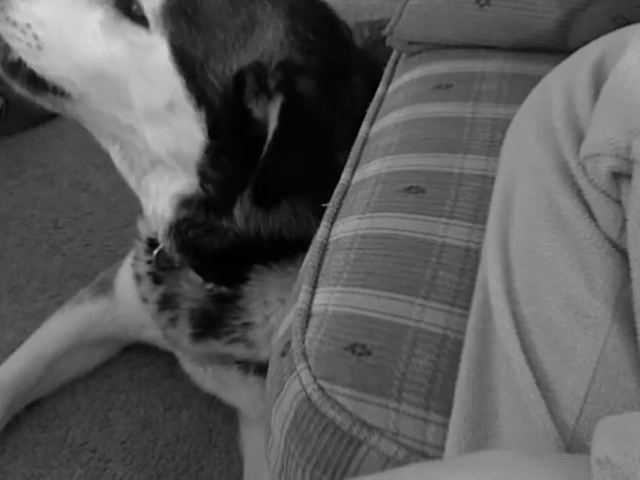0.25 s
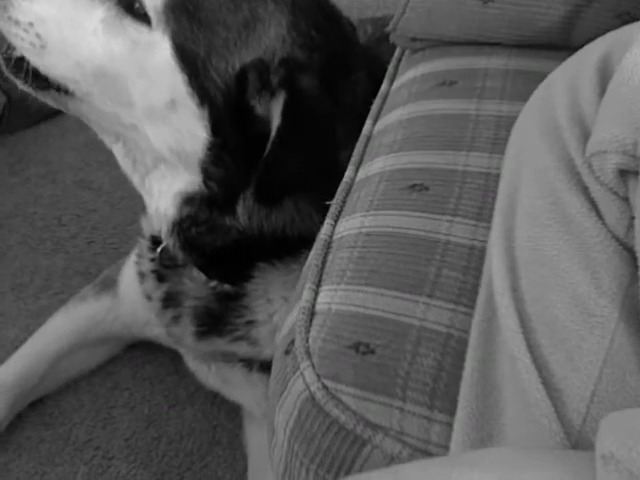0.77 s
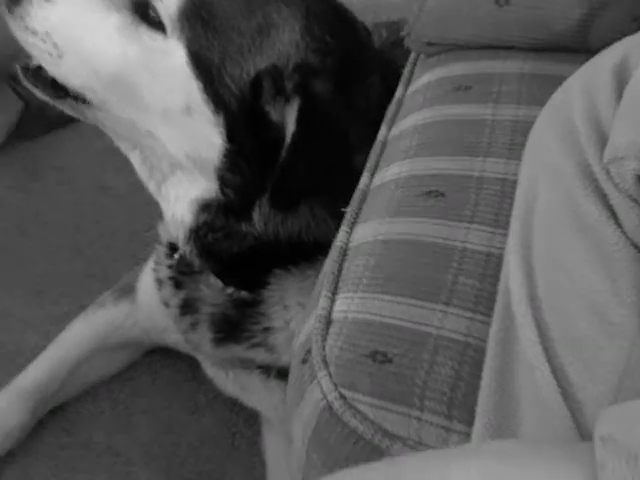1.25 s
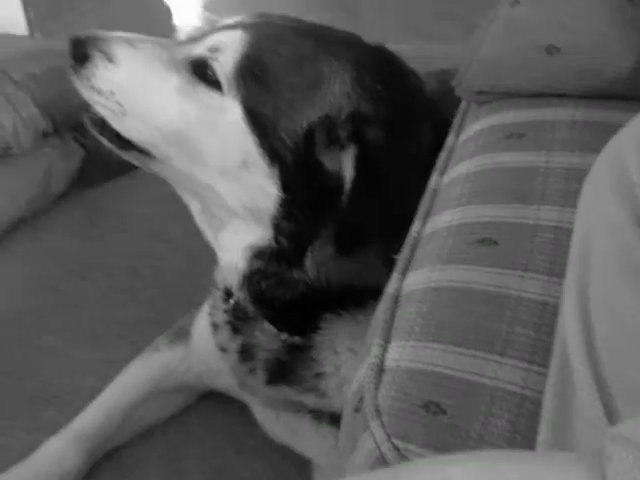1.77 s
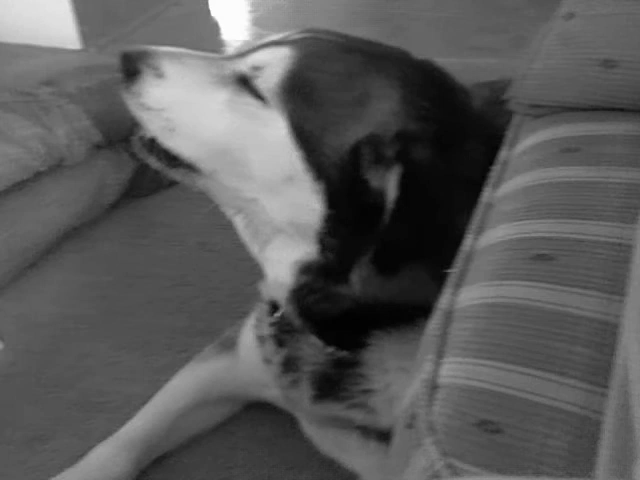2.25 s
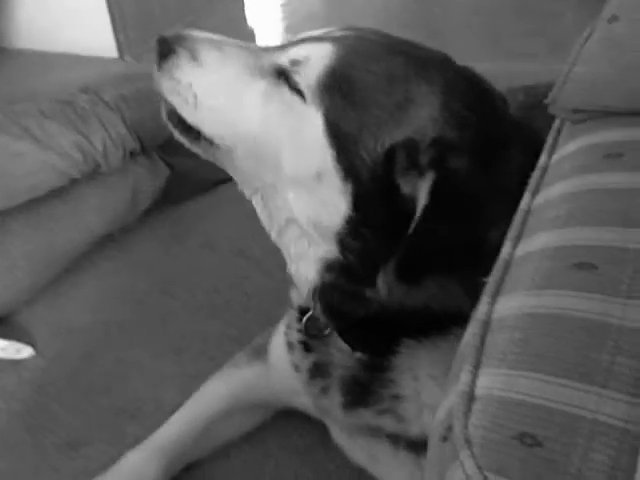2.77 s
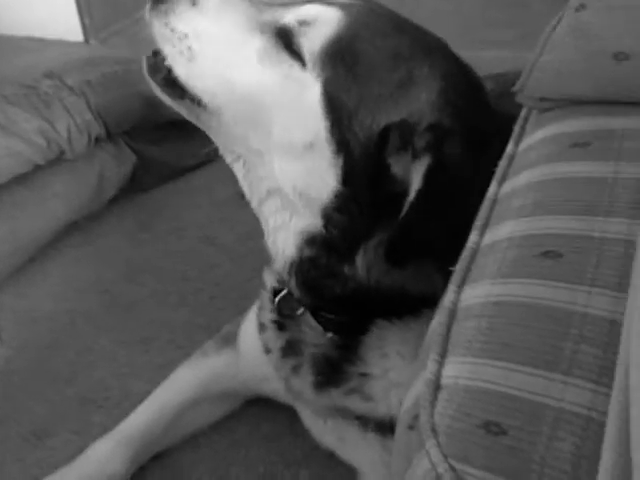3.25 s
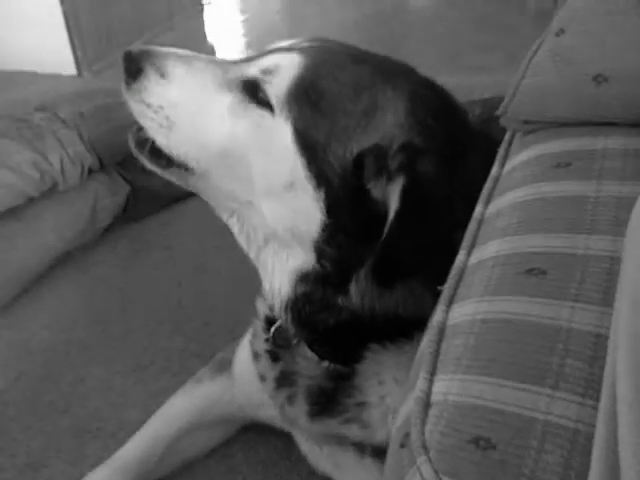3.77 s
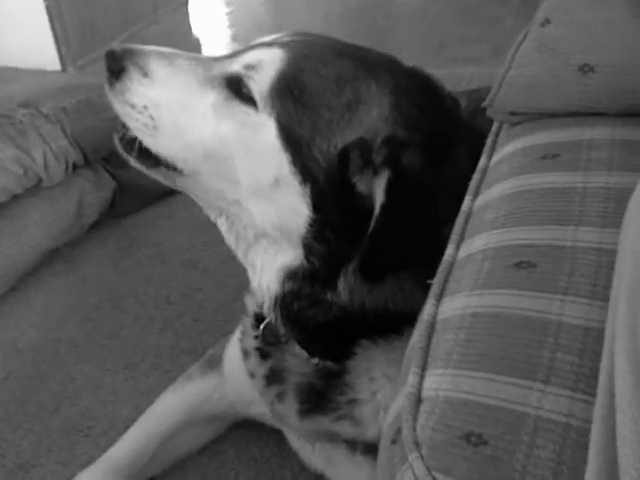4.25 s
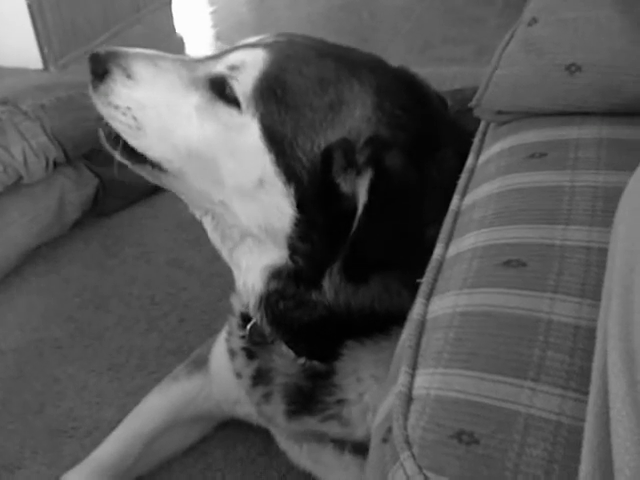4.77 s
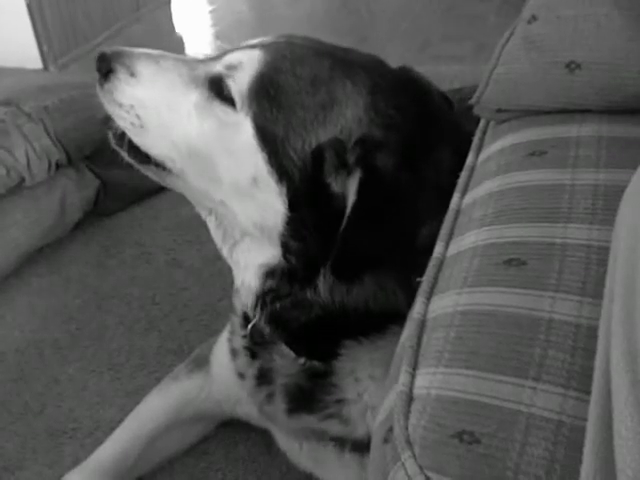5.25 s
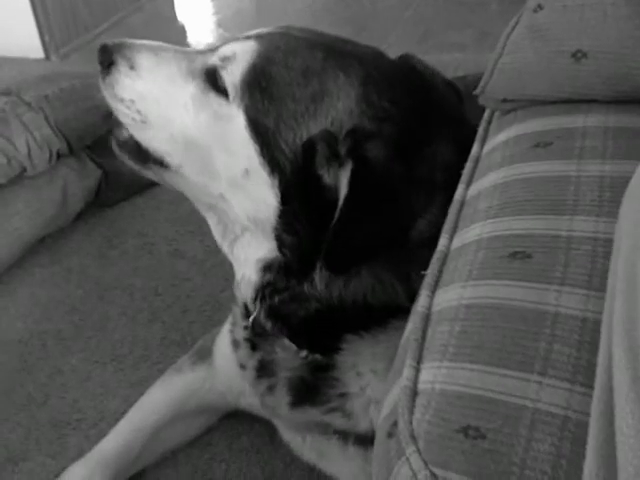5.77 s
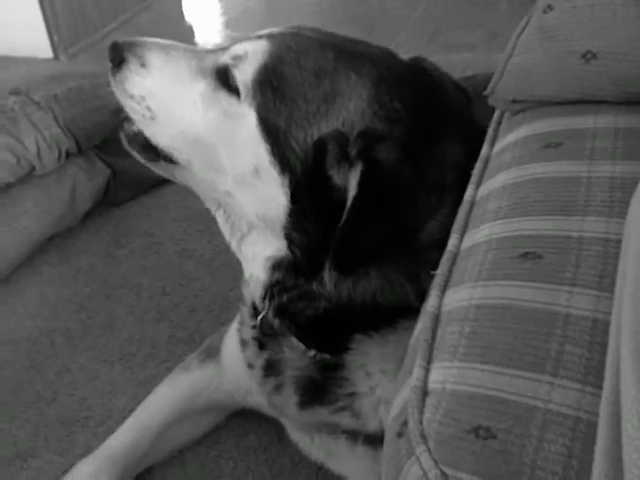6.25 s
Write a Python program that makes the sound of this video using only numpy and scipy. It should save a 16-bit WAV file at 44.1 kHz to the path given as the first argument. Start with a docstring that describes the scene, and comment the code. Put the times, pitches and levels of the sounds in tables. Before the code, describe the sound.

Close to the microphone in a quiet, softly furnished room, an old hound is already mid-howl at 0 s, two pitches sounding together, bright at first and darkening. The second pitch stops around 0.8 s; the remaining note sags gently and ends in a weak gargle near 1.5 s. Tiny lip clicks follow at 1.6-1.7 s. A thin, very high whistling whine chirps in at 1.8 s with airy nasal hiss, and from 2 s the howl swells up, loudest around 2.2-2.7 s, then roughens into a gargle until 3.2 s. It slides down, wavers and cracks between clear and rough notes, dying by 5.2 s; the whistle sinks and stops at 4 s. Faint dull bumps appear from 3.9 to 4.8 s and at 6.2 s. The whistle returns at 5.3 s, a gargling howl joins at 5.6 s, clearing and cracking until the end at 6.5 s.

```python
"""Old hound howling indoors

A carpeted room: an old hound beside a sofa, an arm's length from the microphone.
Its vocal folds sing clean notes as gliding harmonics, the first beside a second pitch, or slip in a rough gargle.
Twice a thin whistling whine, a gliding sine with flutter, rides on top with a hiss of air, shaped noise.
Clicks of the lips and soft bumps are short noise bursts, over a quiet room tone and faint steady tones."""
import sys
import numpy as np
from scipy import signal
from scipy.fft import rfft, irfft
from scipy.io import wavfile
from scipy.ndimage import uniform_filter1d

SR = 44100
rng = np.random.default_rng(int(sys.argv[2]) if len(sys.argv) > 2 else 0)


def put_to_file(sound):
    """Save the sound as 16-bit audio at rate SR, in the file named by the first command-line argument."""
    columns = np.atleast_2d(sound).T  # one column per channel
    safe = np.clip(columns, -1, 1)
    whole_steps = np.round(safe * 32767)
    wavfile.write(sys.argv[1], SR, whole_steps.astype(np.int16))


N = 286650
T = np.arange(N) / SR


def undb(db):
    """Decibels to gain."""
    return 10 ** (np.asarray(db) / 20)


def unit(x):
    """Scale to rms 1."""
    return x / np.sqrt(np.mean(x ** 2))


def curves(rows):
    """The columns of a table, joined by straight lines in time."""
    s, *columns = np.transpose(rows)
    return [np.interp(T, s, c) for c in columns]


def gate(start, end, fade):
    """1 between two times, with sloping edges just outside them."""
    edges = np.minimum(T - start, end - T) / fade
    return np.clip(edges + 1, 0, 1) ** 2


def swell(start, end, attack, release):
    """Attack, hold and release between two times."""
    edges = np.minimum((T - start) / attack, (end - T) / release)
    return np.sin(np.pi / 2 * np.clip(edges, 0, 1)) ** 2


def gain_at(hz, colour):
    """Gain of a colour at these frequencies, read on a logarithmic pitch scale."""
    f, db = np.transpose(colour)
    return undb(np.interp(np.log(np.maximum(hz, 1)), np.log(f), db))


def noise(colour):
    """Noise of a given colour, rms 1."""
    spectrum = rfft(rng.standard_normal(N))
    return unit(irfft(spectrum * gain_at(np.arange(N // 2 + 1) * SR / N, colour), N))


def wander(hz):
    """Random drift up to about a given rate, rms 1."""
    f = np.arange(N // 20) * SR / N
    real, imaginary = rng.standard_normal((2, len(f)))
    return unit(irfft((real + 1j * imaginary) / (1 + (f / hz) ** 4), N))


def turn(hz):
    """Phase of an oscillator, in radians."""
    return 2 * np.pi * np.cumsum(hz) / SR


def harmonics(phase, hz, levels_db, colour, on, count=30):
    """The low harmonics, each at its own level, and a tail of overtones in the given colour."""
    out, live = np.zeros(N), on > 0
    *low, high = (undb(db[live]) for db in levels_db)
    k = np.arange(len(low) + 1, count)[:, None]
    # standing waves lift some overtones and swallow others as the pitch glides
    grid = np.linspace(0, SR / 2, 300)
    ripple = undb(4.5 * np.interp(k * hz[live], grid, rng.standard_normal(len(grid))))
    tail = (gain_at(k * hz[live], colour) * ripple * np.sin(k * phase[live])).sum(axis=0)
    low_sum = sum(g * np.sin((i + 1) * phase[live]) for i, g in enumerate(low))
    out[live] = high * tail + low_sum
    return np.sqrt(2) * out * on


# colour of the air that leaks through the folds: (frequency [Hz], level [dB])
HUSK_COLOUR = [(200, -28), (330, -11), (500, 4.5), (1000, -5.5), (1400, 9), (1600, -7.5), (2000, 5),
               (2900, -6), (3400, -9), (4100, -17.5), (5200, -16.5), (7000, -22), (11000, -29),
               (15000, -33.5)]


def note(hz, levels_db, on, colour, jitter, overtones_db, husk_db):
    """A clean note: the folds swing evenly and leak air that pulses once a cycle."""
    phase = turn(hz * (1 + jitter * wander(53) + 0.0013 * wander(350)))
    # the faint overtones follow the highest of the strong harmonics
    bright_db = np.mean(levels_db[-3:], axis=0) + overtones_db
    tone = harmonics(phase, hz, levels_db + [bright_db], colour, on)
    tone = tone * (1 + 0.023 * wander(46))
    leak_db = np.mean(levels_db, axis=0) + husk_db + 2.0 * wander(28)
    husk = noise(HUSK_COLOUR) * (1 + .5 * np.cos(phase)) * on * undb(leak_db)
    return tone + husk


def taps(events, colour, rise, decay, trim_db):
    """Short noise bursts that swell and die away, rise and decay in seconds."""
    envelope = np.zeros(N)
    for s, db in events:
        age = np.maximum(T - s, 0)
        envelope += undb(db + trim_db) * (1 - np.exp(-age / rise)) * np.exp(-age / decay)
    return envelope * noise(colour)


# colour of the quiet room: (frequency [Hz], level [dB])
ROOM_COLOUR = [(12, -15.5), (35, -9), (70, -8.5), (95, -5), (125, 1.5), (165, -7.5), (220, -7), (500, -11),
               (1000, -19), (2000, -12), (4000, -21), (8000, -30), (15000, -27.5)]


def room_tone():
    """The quiet room: coloured noise whose level drifts slowly."""
    return noise(ROOM_COLOUR) * undb(-56 + wander(4))


# faint electronic tones: (frequency [Hz], level [dB])
FAINT_TONES = [(8000, -75.5), (12220, -73.5), (12279, -83)]


def electronic_tones():
    """Steady sines high in the treble."""
    return sum(np.sqrt(2) * undb(db) * np.sin(2 * np.pi * hz * T) for hz, db in FAINT_TONES)


# higher pitch sung along with the first note: (start [s], end [s], pitch [Hz])
SECOND_PITCH = (0.0, 0.809, 447)
# its harmonics 1 to 9 before accent, fade and closing: (level [dB])
SECOND_LEVELS = [-31.5, -41.5, -51, -54.5, -52, -48.5, -48, -50.5, -42.5]
# colour of its overtones: (frequency [Hz], level [dB])
SECOND_OVERTONES = [(4400, -30.5), (5000, -21.5), (5600, -27.5), (6300, -20), (9000, -28), (15000, -36)]
ACCENT_DB, ACCENT_S = 4.5, 0.19  # extra level at the start, and its decay time
# one resonance sinks through the harmonics as the mouth closes
OPEN_HZ, CLOSED_HZ, CLOSING_S, CLOSING_WIDTH_HZ, CLOSING_DB = 2393, 1220, 0.29, 410, 21
DARKEN_DB_PER_S = 7  # fade of the ninth harmonic, less for those below
DROOP, DROOP_S = .04, 0.013  # sag of the pitch as it dies, as a share, and its time scale


def second_voice():
    """A steady higher pitch beside the first note, darkening as the mouth closes."""
    start, end, pitch_hz = SECOND_PITCH
    age = np.maximum(T - start, 0)
    droop = DROOP / (1 + np.exp(np.minimum((end + DROOP_S - T) / DROOP_S, 50)))
    hz = pitch_hz * (1 + 0.0054 * wander(10) - droop)
    centre_hz = CLOSED_HZ + (OPEN_HZ - CLOSED_HZ) * np.exp(-age / CLOSING_S)
    accent_db = ACCENT_DB * np.exp(-age / ACCENT_S)
    fade_db = DARKEN_DB_PER_S * age / len(SECOND_LEVELS)
    levels_db = []
    for k, db in enumerate(SECOND_LEVELS, 1):
        resonance_db = CLOSING_DB * np.exp(-((k * hz - centre_hz) / CLOSING_WIDTH_HZ) ** 2)
        levels_db.append(db + accent_db - k * fade_db + 1.8 * wander(7.6) + resonance_db)
    return note(hz, levels_db, gate(start, end, 0.049), SECOND_OVERTONES,
                jitter=0.0031, overtones_db=-2.0, husk_db=-9.5)


# clean notes, one short curve each: (time [s], pitch [Hz], level of the fundamental [dB],
# brightness: upper mouth resonance against the fundamental [dB],
# edge: overtones above that resonance against the fundamental [dB])
NOTE_CURVES = [
    [(0.012, 394.7, -21.5, -10, -5), (0.018, 394.8, -22, -21, 5), (0.072, 393.2, -26, -9, -14),
     (0.174, 382.6, -19.5, -18.5, -17), (0.364, 371.1, -22, -11, -23), (0.508, 371.0, -22, -9.5, -15.5),
     (0.762, 364.8, -24, -11.5, -32.5), (0.85, 359.7, -26.5, -5.5, -24.5), (1.138, 360.6, -27, -3, -25),
     (1.375, 353.2, -29.5, -17.5, -24)],
    [(2.16, 465, -13, -8, -30.5), (2.18, 454, -13.5, -11, -34), (2.332, 445, -12.5, -5, -33),
     (2.424, 469, -9, -8.5, -13.5), (2.502, 480, -12.5, -10, -5), (2.546, 499.7, -10, -7, -9.5),
     (2.604, 511, -8, -17, -23), (2.712, 452, -8.5, -5, -28), (2.755, 443, -24, -9, -26)],
    [(3.22, 441, -17, -23, -33), (3.25, 436, -11, -27, -44), (3.308, 430, -9, -22.5, -39.5),
     (3.464, 402.5, -32.5, -13, -17), (3.574, 378, -21.5, -7, -31), (3.586, 391, -21.5, -5, -17),
     (3.65, 379, -20, -11.5, -40), (3.79, 362, -21, -17, -21), (3.992, 379, -23.5, -14.5, -20),
     (4.04, 392, -24, -17.5, -15.5)],
    [(4.115, 421.7, -17, -6.5, -34), (4.183, 414.7, -17, -7, -28), (4.235, 408.7, -23.5, -11, -16),
     (4.333, 402.6, -19.5, -16.5, -32), (4.39, 417.1, -23.5, -8, -20.5)],
    [(4.675, 410.2, -23.5, -18, -25.5), (4.721, 401.9, -22.5, -21.5, -25),
     (4.825, 389.0, -27, -14.5, -18.5), (4.915, 388.2, -25.5, -19, -25)],
    [(6.015, 409.7, -20, -10, -26.5), (6.047, 411.7, -27.5, -9, -24), (6.083, 387.3, -25, -5, -21),
     (6.217, 393.9, -29, -2.5, -16), (6.31, 406.1, -23, -15.5, -15)],
    [(6.395, 448.1, -19.5, -9, -31), (6.421, 441.8, -16, -10, -29), (6.459, 393.7, -24.5, -12, -25),
     (6.49, 407.0, -20, -11, -24.5)],
]
# how mouth and room colour harmonics 2 to 6: (frequency [Hz], level against the fundamental [dB])
VOWEL_COLOUR = [(700, -5), (745, -5.5), (835, -10), (885, -21.5), (930, -19), (1070, -19), (1170, -7.5),
                (1340, -7), (1450, -15.5), (1580, -26), (1680, -20), (1790, -26), (1940, -22.5),
                (2120, -28), (2350, -27.5), (2520, -39.5), (2700, -29), (3050, -56)]
# how far a harmonic follows the two controls: (frequency [Hz], share of brightness, share of edge)
MOUTH_OPENING = [(734, 0.53, 0.063), (945, 0, 0.25), (1100, 0.83, 0), (1430, 1, 0), (1800, 0, 0.66),
                 (2600, 0, 0.58)]
# colour of the overtones: (frequency [Hz], level [dB])
THROAT_COLOUR = [(2400, -5), (2850, -2), (3300, -22.5), (4300, -26.5), (5000, -11), (5600, -21.5),
                 (6200, -16.5), (7500, -21.5), (11000, -31.5), (15000, -33)]
USUAL_BRIGHTNESS_DB, USUAL_EDGE_DB = -9.5, -20
# the folds grow less steady when pushed: dB of jitter per dB of level above an easy level
EASY_DB, STRAIN = -20, .4


def howl():
    """The main voice: its harmonics glide through the vowel and brighten as the mouth opens."""
    hz, db, brightness_db, edge_db = curves([row for rows in NOTE_CURVES for row in rows])
    on = np.max([gate(rows[0][0], rows[-1][0], .024) for rows in NOTE_CURVES], axis=0)
    at_hz, by_brightness, by_edge = np.transpose(MOUTH_OPENING)
    levels_db = [db]
    for k in range(2, 7):
        bright_lift_db = np.interp(k * hz, at_hz, by_brightness) * (brightness_db - USUAL_BRIGHTNESS_DB)
        edge_lift_db = np.interp(k * hz, at_hz, by_edge) * (edge_db - USUAL_EDGE_DB)
        vowel_db = 20 * np.log10(gain_at(k * hz, VOWEL_COLOUR))
        levels_db.append(db + vowel_db + bright_lift_db + edge_lift_db + 1.45 * wander(14))
    jitter = 0.0024 * undb(STRAIN * (db - EASY_DB))
    return note(hz, levels_db, on, THROAT_COLOUR, jitter, overtones_db=-4.5, husk_db=-16.0)


# gargles: (start [s], end [s], attack [s], release [s],
# slower fold at start [Hz], at end [Hz], faster fold at start [Hz], at end [Hz],
# rise of both in mid-gargle [share], pull of the slower fold [0-1], disorder [0-1],
# level in each of three mouth resonances [dB] x 3, reference level of the rattle [dB])
GARGLE_EVENTS = [ (1.365, 1.551, .025, 0.19, 358, 375, 423, 433, 0.0028, 0.63, 0.54, -28.5, -50, -44, -48),
                 (1.967, 2.099, .12, 0.014, 222, 276.8, 432, 559.7, 0, 0.14, 0.076, -15, -43, -37.5, -49),
                 (2.088, 2.182, 0.025, 0.0095, 440, 432, 582.4, 504, 0.0075, 0.66, 0.57, -24, -32.5, -31, -48),
                 (2.768, 3.06, 0.0053, 0.011, 441, 442, 508.5, 512, 0.0084, 0.64, 0.16, -21.5, -28.5, -54, -49),
                 (3.05, 3.226, .012, 0.011, 437, 444, 536.6, 585, 0, .5, 0.42, -20, -31, -55, -49.5),
                 (4.04, 4.125, 0.011, .012, 395, 421.3, 478, 533, 0, 0.57, 0.83, -20.5, -31, -35, -45),
                 (4.394, 4.545, 0.013, 0.011, 415, 465, 460, 519, 0.007, 0.45, .3, -17.5, -31.5, -32, -41),
                 (4.532, 4.688, 0.011, 0.037, 470, 424.7, 524, 477.4, 0.0055, 0.97, 0.48, -18, -33, -31.5, -43),
                 (4.92, 4.997, 0.011, 0.013, 386, 397, 440, 444, 0.004, 0.36, 0.557, -21.5, -44, -43.5, -48.5),
                 (4.984, 5.21, 0.0099, .13, 394, 344, 443, 390.6, 0.076, 0.077, 0.31, -23, -48.5, -46, -51.5),
                 (5.615, 5.707, 0.042, 0.01, 272, 333.2, 536, 671.5, 0, 0.22, 0.17, -23, -34.5, -30, -50),
                 (5.695, 5.767, .012, 0.013, 457, 468.8, 560, 544.3, 0.0033, 0.72, 0.65, -22.5, -32.5, -31.5, -44),
                 (5.757, 5.819, 0.009, 0.017, 467, 438.4, 539.8, 511, 0.0005, 0.08, 0.12, -15.5, -39, -42, -46),
                 (5.808, 6.032, .012, 0.019, 451, 433.4, 559, 519.7, .025, 0.68, 0.759, -26, -38, -39, -47),
                 (6.314, 6.405, .012, 0.011, 405, 442, 488, 500.5, 0, 0.58, 0.49, -19.5, -29.5, -26.5, -42),
                 ]
SETTLE_S = 0.01235  # the glide of both folds starts this late and ends this early


def gargle_controls():
    """In each gargle both folds glide along a low arch, while pull, disorder and levels hold."""
    points, arch, on = [], np.ones(N), np.zeros(N)
    for start, end, attack, release, slow_from, slow_to, fast_from, fast_to, rise, *held in GARGLE_EVENTS:
        points.append((start + SETTLE_S, slow_from, fast_from, *held))
        points.append((end - SETTLE_S, slow_to, fast_to, *held))
        arch += rise * np.sin(np.pi * np.clip((T - start) / (end - start), 0, 1))
        on += swell(start, end, attack, release)
    slow_hz, fast_hz, *held = curves(points)
    return on, slow_hz * arch, fast_hz * arch, *held


def resonate(x, low_hz, high_hz):
    """One steep resonance of the mouth, held near rms 1."""
    band = signal.butter(2, [low_hz, high_hz], "band", fs=SR, output="sos")
    y = signal.sosfiltfilt(band, x)
    return y / np.sqrt(uniform_filter1d(y ** 2, SR // 25) + 1e-9)


# resonances of the mouth: (lower edge [Hz], upper edge [Hz])
MOUTH_BANDS = [(330, 860), (800, 1153), (1150, 1384)]
# colour of the rough noise in the mouth: (frequency [Hz], level [dB])
RASP_COLOUR = [(280, -14.5), (380, 2.5), (550, -5.5), (720, -1), (950, -0.5), (1350, 3.5), (1600, -23.5),
               (3000, -46.5)]
# colour of the rattle above it: (frequency [Hz], level [dB])
RATTLE_COLOUR = [(1300, -31.5), (1650, -2.5), (2050, 2.5), (2400, -3), (2850, -7.5), (3400, -16),
                 (4300, -39.5), (5000, -15), (5600, -21.5), (6200, -19.5), (7500, -31), (15000, -35)]


def gargle():
    """The faster fold lingers in step with the slower one, then slips a cycle: sidebands at the beat rate."""
    on, slow_hz, fast_hz, pull, disorder, *bands_db, high_db = gargle_controls()
    pull = np.clip(pull, 0, .9)
    beat = turn((fast_hz - slow_hz) * (1 + 0.65 * disorder * wander(50)))
    slip = beat - 2 * np.angle(1 + pull * np.exp(1j * beat))
    phase = turn(slow_hz * (1 + 0.041 * disorder * wander(107.3))) + slip
    # the swing shrinks and recovers around each slip
    swing = 1 + 0.71 * pull * np.cos(beat + 0.75) + 0.4 * disorder * wander(76)
    rasp = noise(RASP_COLOUR) * disorder * undb(-12)
    out = np.zeros(N)
    for k, ((low_hz, high_hz), db) in enumerate(zip(MOUTH_BANDS, bands_db), 1):
        out += undb(db) * resonate(swing * (np.sin(k * phase) + rasp), low_hz, high_hz)
    # above the mouth resonances the overtones blur into a rattle
    rattle = harmonics(phase, fast_hz, [high_db - 10.5], RATTLE_COLOUR, on)
    rattle = rattle + undb(high_db - 2.5) * noise(RATTLE_COLOUR) * on
    return out * on + swing * rattle


# small clicks of the lips: (time [s], level before trim [dB])
LIP_CLICKS = [(1.569, -32.5), (1.675, -40), (1.724, -36)]


def lip_clicks():
    """Very short noise bursts, strongest around 1 kHz."""
    colour = [(200, -4), (1000, 5), (5000, -9), (15000, -36.5)]
    return taps(LIP_CLICKS, colour, rise=0.00037, decay=0.0018, trim_db=-6.5)


# glide of the two whines: (time [s], pitch [Hz])
WHINE_GLIDES = [
    [(1.78, 3167), (1.81, 3791), (1.82, 4510), (1.87, 4930), (1.91, 4963), (1.95, 5488), (1.96, 4913),
     (1.98, 5196), (2.04, 5490), (2.17, 4980), (2.2, 5300), (2.3, 4816), (2.54, 4656), (2.71, 4782),
     (2.75, 5170), (2.79, 4770), (2.83, 4944), (3.0, 4560), (3.03, 4820), (3.09, 4410), (3.16, 4610),
     (3.21, 4400), (3.35, 4430), (3.38, 3754), (3.4, 3730), (3.44, 4356), (3.48, 4280), (3.51, 3836),
     (3.66, 3630), (3.69, 3380), (3.75, 3590), (3.79, 3270), (3.82, 3278), (3.85, 3600), (3.9, 3676),
     (3.91, 3393), (3.94, 3708), (3.99, 2962)],
    [(5.28, 3150), (5.296, 3460), (5.334, 4110), (5.35, 4050), (5.358, 4440), (5.392, 4560), (5.446, 5180),
     (5.51, 5567), (5.584, 5340), (5.742, 5443), (5.778, 4950), (5.816, 4993), (5.9, 4790), (5.986, 5023),
     (6.024, 4845), (6.058, 4970), (6.094, 4758), (6.146, 4807), (6.2, 4633), (6.24, 4846), (6.268, 4620),
     (6.41, 4477), (6.442, 4733), (6.5, 4595)],
]
# loudness of the two whines: (time [s], level [dB])
WHINE_LEVELS = [
    [(1.78, -32), (1.79, -18.5), (1.91, -16), (1.98, -35), (2.03, -20), (2.09, -34), (2.14, -19.5),
     (2.25, -26.5), (2.29, -18.5), (2.7, -22.5), (2.75, -40.5), (2.79, -22), (2.84, -30), (2.92, -19),
     (3.1, -21.5), (3.12, -14.5), (3.28, -25.5), (3.32, -19), (3.36, -28.5), (3.37, -17.5), (3.48, -30),
     (3.51, -20), (3.84, -23.5), (3.91, -41), (3.98, -31), (3.99, -41.5)],
    [(5.28, -46), (5.3, -24), (5.398, -16.5), (5.5, -37), (5.592, -21), (5.608, -32), (5.694, -28.5),
     (5.734, -32.5), (5.782, -16.5), (5.922, -13), (5.986, -22), (6.024, -14.5), (6.19, -22), (6.39, -18),
     (6.458, -29.5), (6.5, -22)],
]
# the whine chirps as it catches, and flips to other resonances:
# (start [s], end [s], pitch at start [Hz], pitch at end [Hz], level [dB])
WHINE_FLIPS = [(1.759, 1.771, 3050, 3640, -29.5), (1.952, 2, 6070, 6080, -24.5),
               (2.053, 2.098, 6070, 6060, -24), (3.872, 3.96, 2656, 2560, -36),
               (5.265, 5.274, 3200, 3690, -39), (5.508, 5.566, 6030, 6080, -31.5),
               (5.59, 5.645, 6070, 6070, -33.5), (5.705, 5.74, 6030, 6090, -34)]
TREMBLE, TREMBLE_HZ = .005, 12  # depth as a share of the pitch, and mean rate
# the jet flutters more with each dB that it weakens below the steady level
STEADY_DB, STEADY_FLUTTER, FLUTTER_PER_DB = -24, 0.25, 0.03
FLIP = 0.36  # share of its swing that the whine loses during a flip


def whine(voice):
    """A narrow jet whistles far above the voice, whose pulses shake its pitch."""
    hz, = curves([row for rows in WHINE_GLIDES for row in rows])
    db, = curves([row for rows in WHINE_LEVELS for row in rows])
    flutter = np.clip(STEADY_FLUTTER + FLUTTER_PER_DB * np.maximum(STEADY_DB - db, 0), 0, 1)
    on = np.max([gate(rows[0][0], rows[-1][0], 0.015) for rows in WHINE_LEVELS], axis=0)
    tremble = TREMBLE * np.sin(turn(TREMBLE_HZ * (1 + .2 * wander(4))))
    shake = 0.0026 * wander(40) + 0.023 * flutter * wander(330) + 0.0059 * voice
    phase = turn(hz * (1 + tremble + shake))
    tone = np.sin(phase) + undb(-29.5) * np.sin(2 * phase) + undb(-57.5) * np.sin(3 * phase)
    out = tone * on * undb(db + 1.26 * wander(32)) * (1 + .5 * flutter * wander(110))
    for start, end, start_hz, end_hz, squeak_db in WHINE_FLIPS:
        squeak_hz = np.interp(T, [start, end], [start_hz, end_hz]) * (1 + 0.0062 * wander(260))
        flipped = gate(start + 0.005, end - .005, 0.018)
        squeak = undb(squeak_db) * flipped * np.sin(turn(squeak_hz))
        out = out * (1 - FLIP * flipped) + squeak
    return np.sqrt(2) * out


# colour of the air through the nose: (frequency [Hz], level [dB])
NOSE_COLOUR = [(300, -21), (1500, -17.5), (2400, -13.5), (2850, 3), (3250, -11.5), (3700, 2), (4100, 8),
               (4450, -2), (5300, 3.5), (6500, -4), (8000, -10), (10000, -8.5), (12500, -14),
               (15500, -23.5)]
# the hiss starts with each whine and sags as the whine goes on
AIR_DB, AIR_SAG_DB_PER_S, AIR_ATTACK_S, AIR_RELEASE_S = -37, 4.2, 0.15, 0.042


def air():
    """The air that feeds the whine hisses through the nose."""
    flow = np.zeros(N)
    for rows in WHINE_LEVELS:
        start, end = rows[0][0], rows[-1][0]
        breath = swell(start - .025, end + AIR_RELEASE_S, AIR_ATTACK_S, AIR_RELEASE_S + 0.034)
        flow += breath * undb(-AIR_SAG_DB_PER_S * (T - start))
    return noise(NOSE_COLOUR) * flow * undb(AIR_DB + 0.57 * wander(30))


# soft bumps: (time [s], level before trim [dB])
SOFT_BUMPS = [(3.934, -31), (3.999, -32), (4.139, -30), (4.321, -30.5), (4.572, -37.5), (4.733, -38),
              (4.839, -50), (6.202, -29)]


def soft_bumps():
    """Dull noise bursts, strongest around 130 Hz."""
    colour = [(60, -39), (130, 0.5), (210, -3.5), (320, -28.5), (1500, -47.5), (6000, -65.0)]
    return taps(SOFT_BUMPS, colour, rise=0.0068, decay=0.018, trim_db=-7.5)


def room(x, t60, wet_db):
    """Carpet and upholstery leave only a short, weak tail, falling 60 dB in t60 seconds."""
    age = T[:SR // 2]
    tail = rng.standard_normal(len(age)) * np.exp(-np.log(1000) * age / t60) * (age > .004)
    return x + undb(wet_db) * signal.fftconvolve(x, tail / np.linalg.norm(tail))[:N]


LEFT_DB = -0.8  # level of the left channel against the right


def scene():
    """The dog, small movements and the quiet room: one signal, slightly softer on the left."""
    voice = second_voice() + howl() + gargle()
    dog = voice + lip_clicks() + whine(voice) + air()
    near = room(dog + soft_bumps(), t60=.26, wet_db=-17)
    balance = undb(np.array([[LEFT_DB], [-LEFT_DB]]) / 2)
    return (near + room_tone() + electronic_tones()) * balance


TOP_HZ = 15450


def record(dry):
    """The recorder cuts the top with a steep low-pass."""
    return signal.sosfilt(signal.ellip(10, .1, 80, TOP_HZ, fs=SR, output="sos"), dry)


dry = scene()
out = record(dry)
put_to_file(out)
```